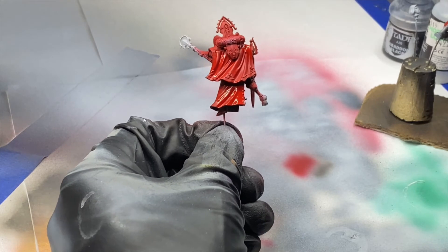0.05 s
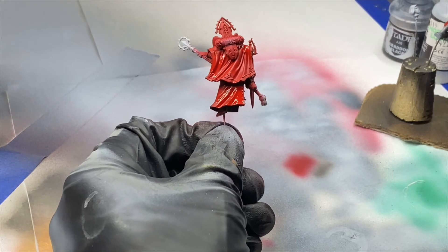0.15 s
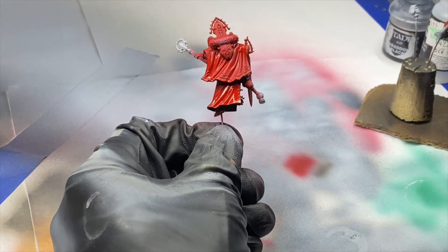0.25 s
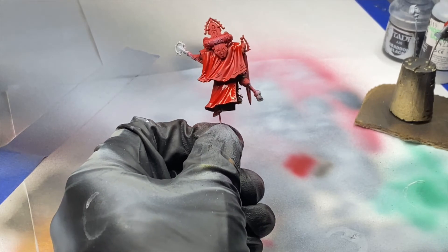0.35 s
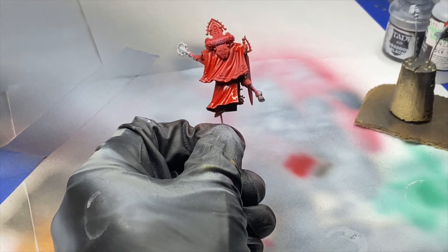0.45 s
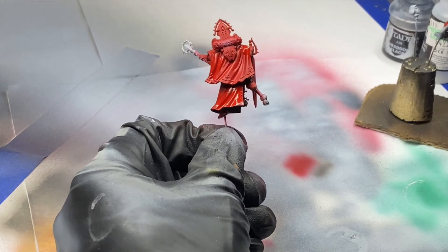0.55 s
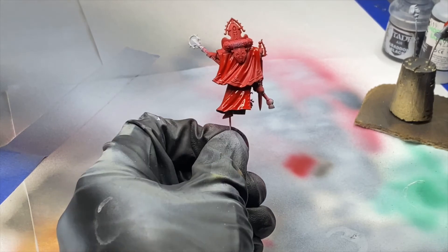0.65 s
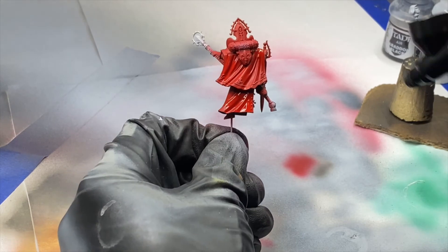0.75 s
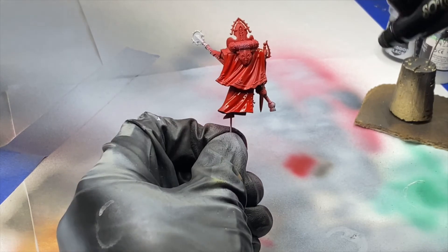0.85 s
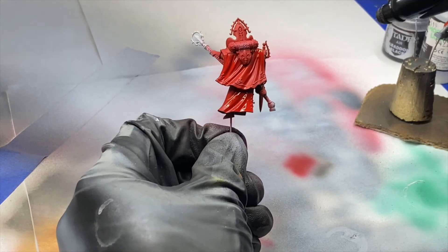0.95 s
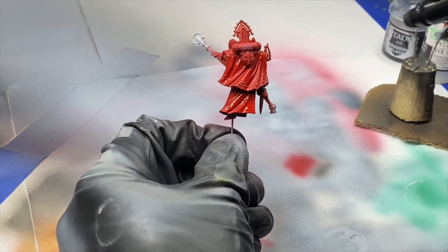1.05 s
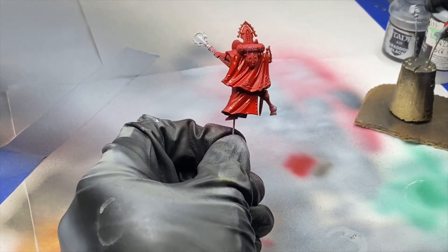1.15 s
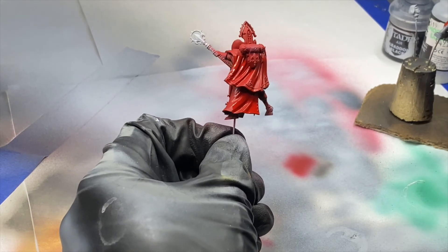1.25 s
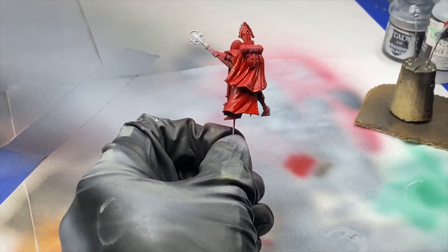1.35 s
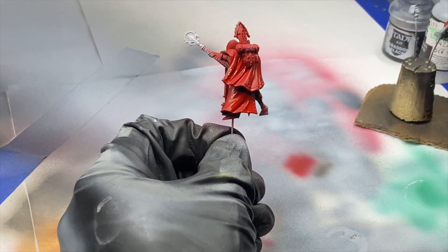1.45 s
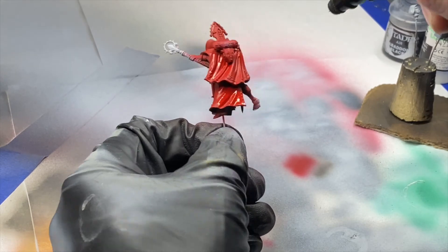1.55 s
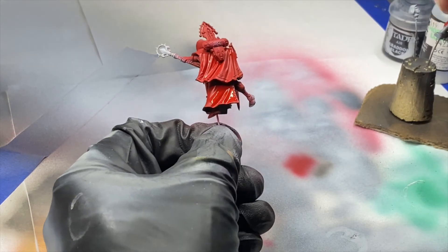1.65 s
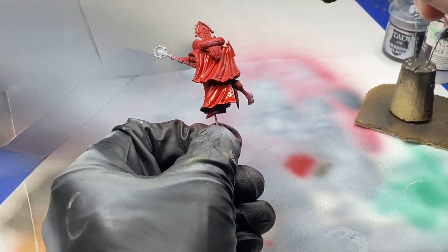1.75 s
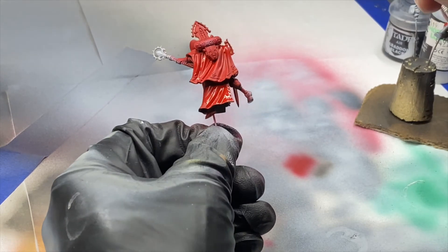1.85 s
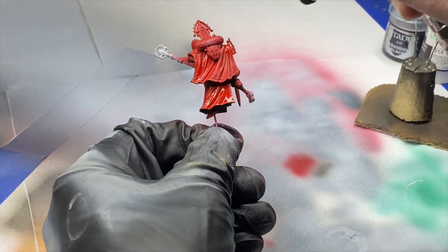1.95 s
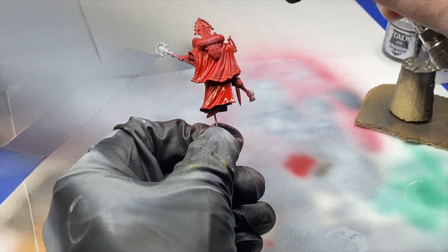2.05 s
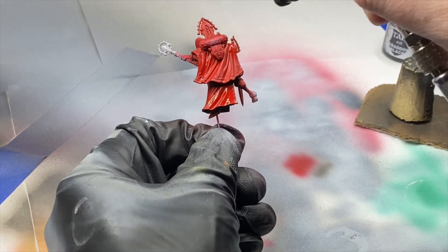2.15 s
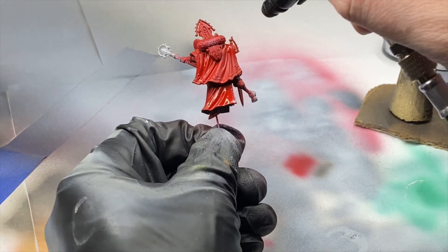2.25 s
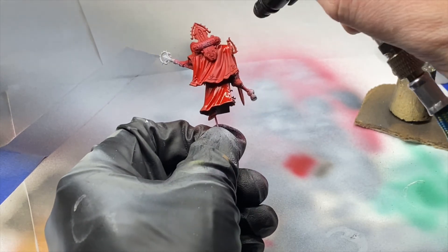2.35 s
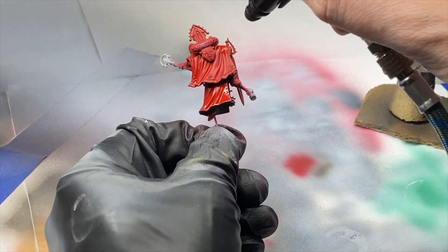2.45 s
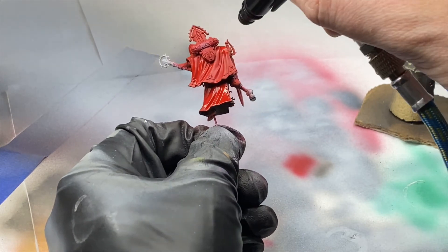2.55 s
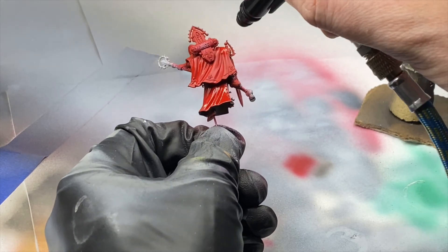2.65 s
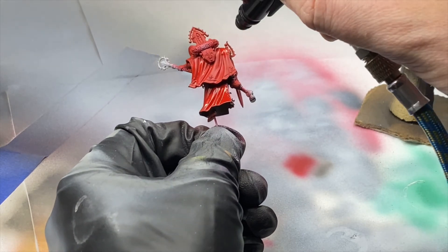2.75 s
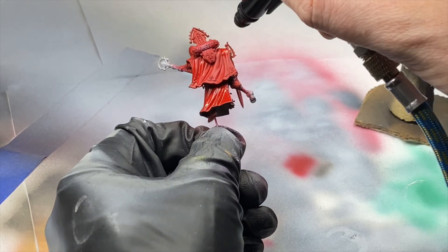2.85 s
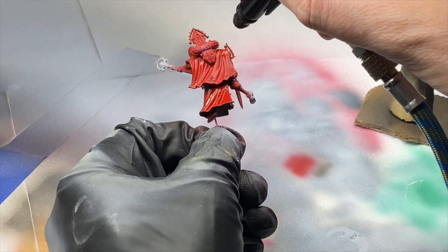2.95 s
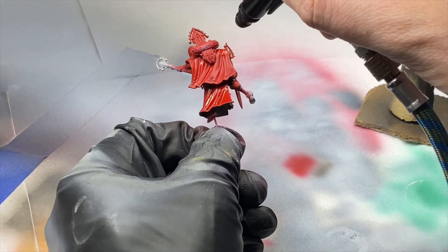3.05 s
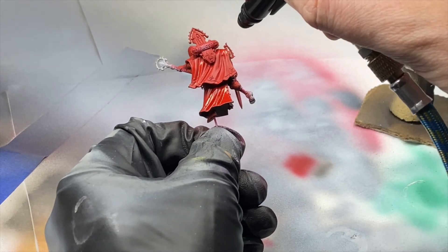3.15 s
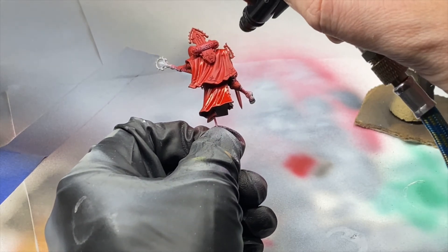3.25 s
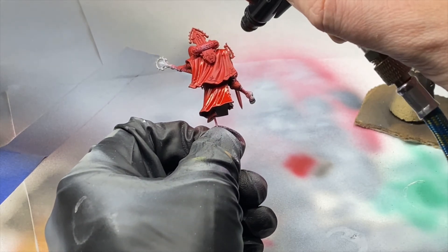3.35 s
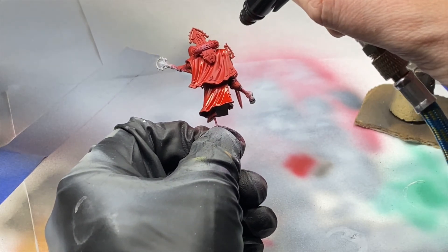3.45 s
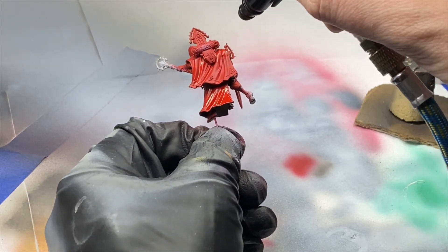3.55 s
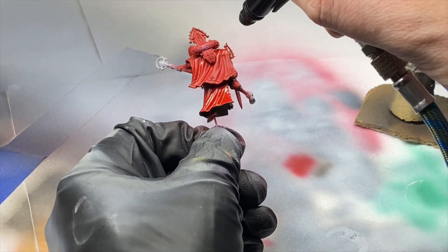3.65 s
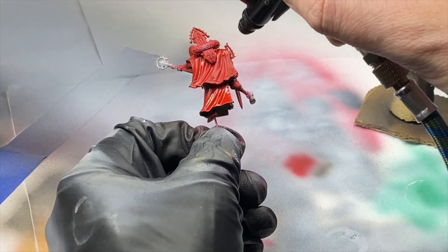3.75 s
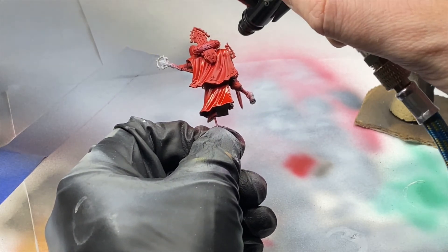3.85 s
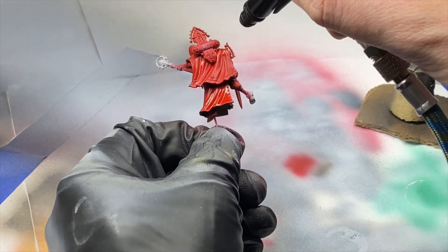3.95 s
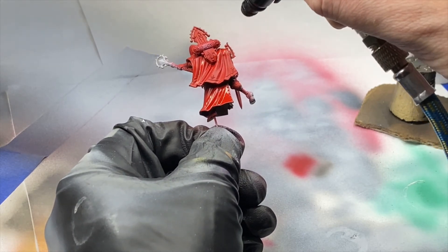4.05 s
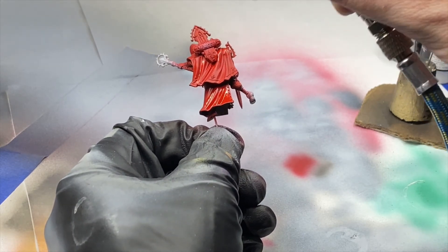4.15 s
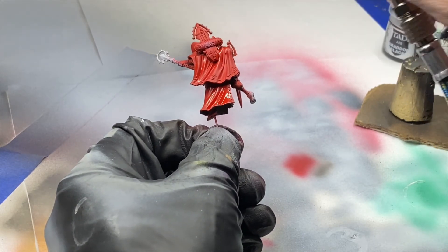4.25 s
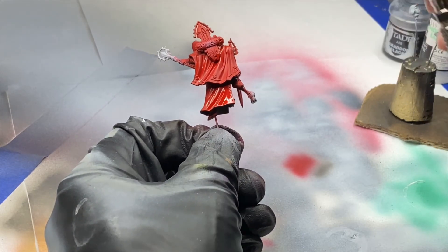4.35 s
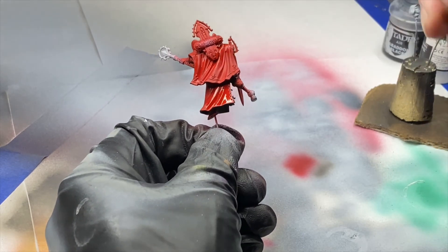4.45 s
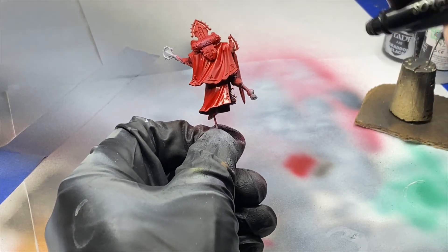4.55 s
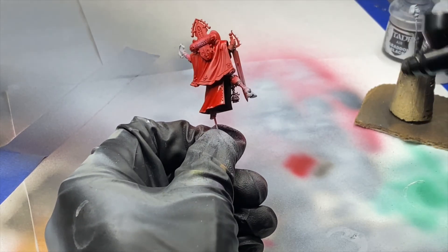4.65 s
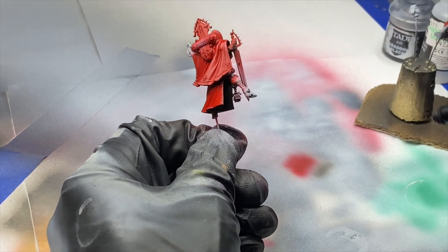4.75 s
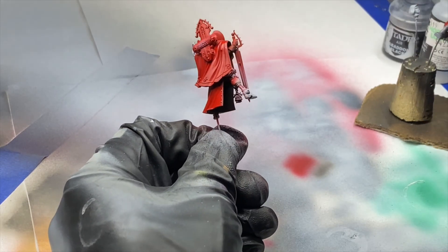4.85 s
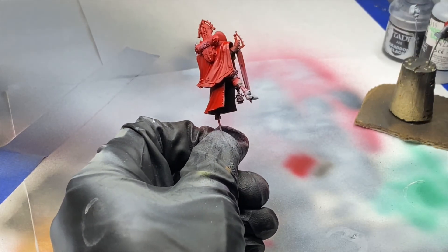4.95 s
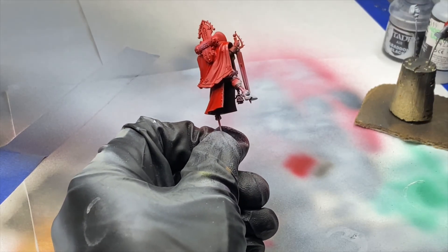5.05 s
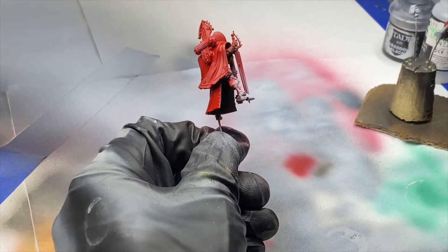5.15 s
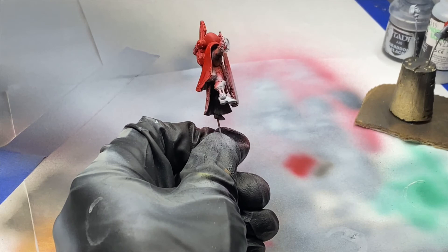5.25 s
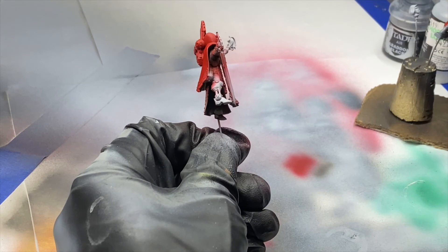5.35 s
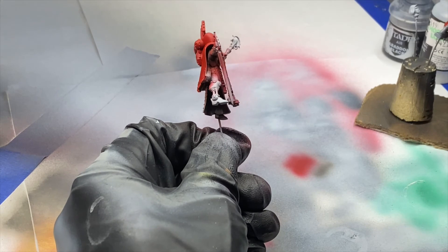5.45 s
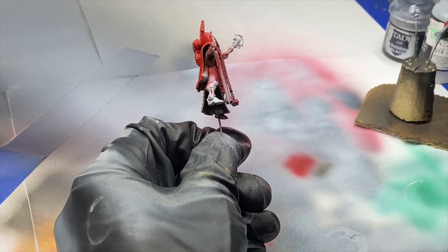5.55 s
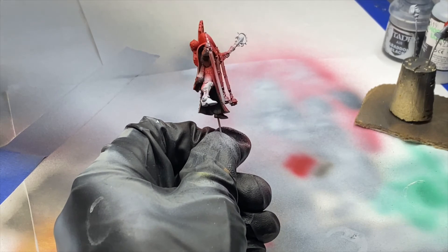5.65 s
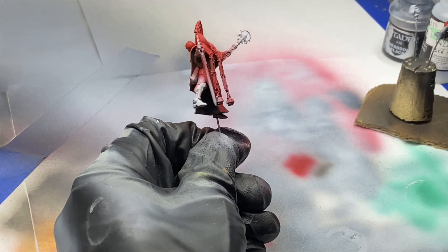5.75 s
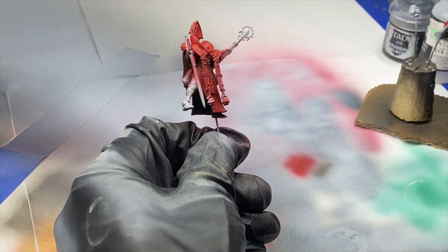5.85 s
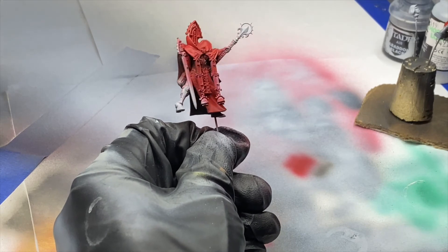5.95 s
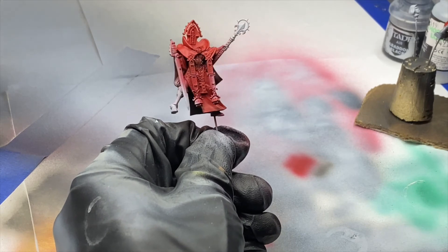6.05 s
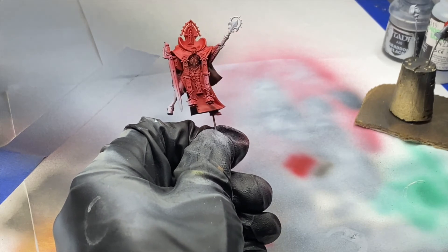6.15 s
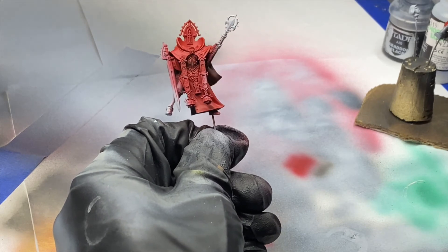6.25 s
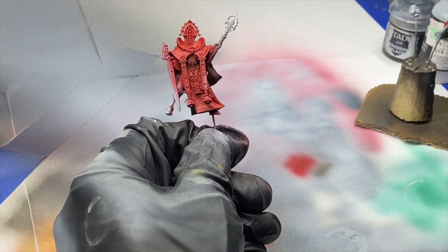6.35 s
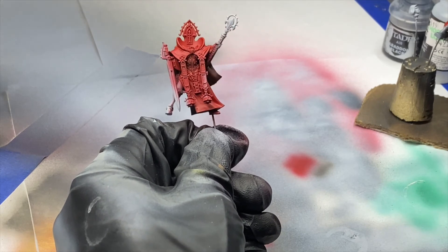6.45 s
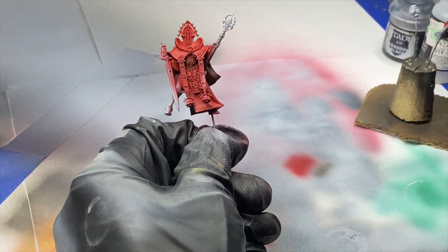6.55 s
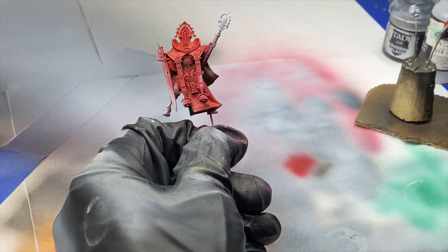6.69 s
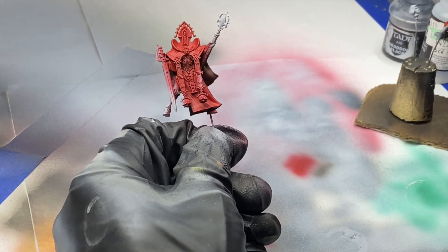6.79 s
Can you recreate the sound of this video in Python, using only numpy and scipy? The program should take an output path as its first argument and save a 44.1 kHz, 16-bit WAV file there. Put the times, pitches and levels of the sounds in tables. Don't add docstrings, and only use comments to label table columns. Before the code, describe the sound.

A small spray gun hisses twice, about a second each, bright and airy, then only muffled fan hum and faint soft hand bumps remain.

```python
import sys
import numpy as np
from scipy import signal
from scipy.fft import rfft, irfft, next_fast_len
from scipy.io import wavfile
from scipy.ndimage import uniform_filter1d, map_coordinates

SR = 44100
rng = np.random.default_rng(int(sys.argv[2]) if len(sys.argv) > 2 else 0)


def natural_amplitude(level_db):
    exponent = np.asarray(level_db, float) / 20
    return 10 ** exponent


def put_to_file(sound):
    columns = np.atleast_2d(sound).T
    safe = np.clip(columns, -1, 1)
    whole_steps = np.round(safe * 32767)
    wavfile.write(sys.argv[1], SR, whole_steps.astype(np.int16))


N = 300762
BLOWING = [slice(SR, 5 * SR // 2), slice(5 * SR // 2, 9 * SR // 2)]


def airbrush():
    return sum(valve(*VALVE[k]) * (nozzle(k) + splash(k)) for k in range(len(VALVE)))


# start_s, rise [s], shut_s, fall_t60 [s]
VALVE = [
    (1.105, .006, 2.019, 0.098),
    (2.856, .014, 4.078, 0.062),
]


def valve(opens, rise, shuts, t60):
    t = np.arange(N) / SR
    swell = 1 / (1 + np.exp(np.clip((opens - t) / (rise / 3), -60, 60)))
    return swell * natural_amplitude(-60 * np.clip(t - shuts, 0, None) / t60)


# start_s, pressure [dB], needle opening [0-1]
TRIGGER_PULL = [
    [(1.1, -63, .1), (1.112, -53.5, 0), (1.144, -51.5, 0), (1.155, -48, 0.83), (1.2, -53, 0.66),
     (1.36, -51, 0.4), (1.45, -51, .8), (1.64, -52.5, 0.73), (2.0, -53.5, 0.76)],
    [(2.855, -55, 0.6), (2.872, -41.5, 1.1), (3.1, -47, 0.91), (3.22, -46.5, 0.42), (3.37, -46.5, 0.46),
     (3.5, -46.5, 0.9), (3.68, -46.5, 0.4), (3.9, -47.5, 0.15), (4.0, -47.5, 0.7)],
]
# frequency [Hz], density [dB per Hz]
JET = [
    [(5000, -60.5), (7000, -27.5), (8600, -17), (9700, -5), (10900, -3), (12500, -1), (13800, -4.5),
     (15700, -8)],
    [(5000, -71.5), (7500, -27.5), (8700, -8.5), (9500, -2), (11000, -2.5), (13200, -1.5), (14500, -6),
     (15700, -7.5)],
]
# pitch [Hz], width [Hz], level [dB]
CAP = [
    [(10150, 460, -5), (11030, 410, 1.5)],
    [(11100, 390, -1.5), (11380, 290, -0.5)],
]
# start_s, end_s, start level [dB re jet], end level [dB re jet]
CAP_SINGS = [
    (1.147, 1.31, 7.5, 5.5),
    (1.42, 2.03, 2, 6),
    (3.24, 3.47, 3, 4),
    (3.49, 3.69, 7, -3.5),
    (3.86, 4.01, 7, 7),
]
CAP_IDLE_DB = [-1, -4.5]
# frequency [Hz], density [dB per Hz]
ROAR = [
    [(5500, -52.5), (6300, -7.5), (7000, -11.5), (7600, -4), (8200, -2), (9000, -2), (10500, -51)],
    [(5000, -50.5), (5900, -3.5), (6300, -6.5), (6700, 1), (7800, 1.5), (8400, -3), (9400, -8),
     (11000, -39)],
]
# pitch [Hz], width [Hz], level [dB]
WHISTLE = [
    [(7350, 400, 0)],
    [(7150, 200, 0)],
]
# level when shut [dB re jet], gain when open [dB]
ROAR_LAW = [
    (-24.5, 18.3),
    (-19.5, 14.3),
]
WHISTLE_LAW = [
    (-34, 24),
    (-26, 22),
]
NEEDLE_LEADS_S, NEEDLE_BACK = .05, 0.37


def nozzle(k):
    span = BLOWING[k]
    jet_db, needle = curves(TRIGGER_PULL[k])
    spring_back = np.clip((np.arange(N) / SR - VALVE[k][2]) / NEEDLE_LEADS_S + 1, 0, 1)
    needle = needle - NEEDLE_BACK * spring_back
    roar_shut, roar_gain = ROAR_LAW[k]
    whistle_shut, whistle_gain = WHISTLE_LAW[k]
    roar_db = roar_shut + roar_gain * needle + 4.0
    whistle_db = whistle_shut + whistle_gain * needle - 1.5 + 2.8 * wobble(14)
    eddies = natural_amplitude(1.1 * wobble(700) + 0.24 * wobble(40))

    jet = natural_amplitude(5) * rush(shape(JET[k]), span=span, patchy_db=1.0, speckle=.15)
    cap_gain = natural_amplitude(-1.9) * passes(CAP_SINGS, CAP_IDLE_DB[k], edge_s=.022)
    cap = cap_gain * rush(modes(CAP[k]), span=span, patchy_db=0.1, speckle=0.1517)
    roar = natural_amplitude(roar_db) * rush(shape(ROAR[k]), span=span, patchy_db=2.5, speckle=0.46)
    whistle = natural_amplitude(whistle_db) * rush(modes(WHISTLE[k]), span=span, patchy_db=3.9, speckle=.15)
    return natural_amplitude(jet_db + 0.52) * eddies * (jet + cap + roar + whistle)


# pitch [Hz], width [Hz], level [dB]
HOLLOWS = [
    [[(5180, 230, 2), (5820, 780, -4.5)], [(4780, 470, 0), (4450, 300, -13.5)], [(2930, 350, 3),
     (3570, 1800, 1.5)], [(1300, 370, -0.5), (1814, 180, -3)]],
    [[(5550, 300, -3), (5060, 500, -13)], [(4700, 550, 1.5), (5250, 700, -1.5)], [(3360, 508, -2.5),
     (4082, 600, -1)], [(2270, 250, -2.5), (2696, 280, 2.5), (3167, 300, -2.5)]],
]
# start_s, end_s, start level [dB], end level [dB]
UPPER_FOLD = [(1.144, 1.34, -54, -69.5), (1.383, 1.915, -54.5, -56), (1.952, 1.981, -52, -61.5),
              (2.854, 3.02, -67.5, -61), (3.016, 3.28, -56, -72), (3.29, 3.645, -61, -63),
              (3.65, 3.88, -55, -58), (3.925, 4.03, -59.5, -65)]
LOWER_FOLD = [(1.13, 1.34, -63.5, -75), (1.396, 1.938, -61, -61), (1.94, 2.002, -61, -67),
              (2.85, 3.275, -52.5, -62.5), (3.295, 3.62, -59.5, -52.5), (3.65, 3.7, -53.5, -58),
              (3.877, 4.073, -55, -59.5)]
SCATTER = [(1.4, 2.007, -86, -77), (2.877, 3.192, -56.5, -55.5), (3.2, 3.301, -58, -61.5),
           (3.399, 3.653, -61, -59.5), (3.723, 3.793, -65, -66), (3.931, 4.086, -69, -62)]
BASE = [(1.462, 1.533, -66.5, -65), (1.558, 1.635, -65.5, -69), (1.66, 1.8, -70, -70),
        (1.851, 1.985, -64.5, -71.5), (2.889, 3.2, -67, -61.5), (3.21, 3.636, -60.5, -62.5),
        (3.637, 3.905, -58.5, -65), (3.897, 4.072, -62.5, -72)]
STRAY_DB = [
    [-71.5, -82, -91, -83.5],
    [-68, -72.5, -71, -73.5],
]
PAINT_STARTS = [1.143, 2.856]
PAINT_ON_S, TREMOR_DB = 0.011, 1.5


def splash(k):
    paint = np.clip((np.arange(N) / SR - PAINT_STARTS[k]) / PAINT_ON_S, .25, 1)
    sweeps = [UPPER_FOLD, LOWER_FOLD, SCATTER, BASE]
    out = np.zeros(N)
    for rows, stray_db, hollow in zip(sweeps, STRAY_DB[k], HOLLOWS[k]):
        ring = rush(modes(hollow), span=BLOWING[k], patchy_db=2.43, speckle=0.41)
        out += natural_amplitude(TREMOR_DB * wobble(12)) * passes(rows, stray_db) * ring
    return paint * out


# start_s, end_s, start level [dB], end level [dB]
OVERSPRAY = [
    (3.12, 3.24, -75, -75.5),
    (3.76, 3.9, -70.5, -75),
]
# pitch [Hz], width [Hz], level [dB]
BENCH = [
    (1470, 500, 0.5),
    (1900, 400, -2.5),
]


def overspray():
    return passes(OVERSPRAY, -120) * rush(modes(BENCH), span=BLOWING[1], patchy_db=1.5, speckle=.25)


# delay [s], gain [ratio]
BOOTH = [(.0011, 0.12), (.0019, -0.151), (.0032, 0.12), (.0047, 0.095), (.0071, -.12), (0.01, 0.082)]


def booth(x):
    return x + sum(gain * np.roll(x, round(s * SR)) for s, gain in BOOTH)


# start_s, level_db (peak), pitch factor [ratio]
TICKS = [
    (1.096, -51.5, 1.01),
    (2.846, -69, 1.3),
]
# pitch_hz, level_db, t60_s
TRIGGER = [(5330, -5.5, .008), (9900, -1, .007), (10870, 3.5, .008)]


def trigger():
    out, t = np.zeros(N), np.arange(SR // 20) / SR
    onset = (1 - np.exp(-t / .002)) ** 2
    for s, db, pitch in TICKS:
        ring = sum(natural_amplitude(level - 60 * t / t60) * np.sin(2 * np.pi * pitch * hz * t) for hz, level, t60 in TRIGGER)
        out[round(s * SR):][:len(t)] += natural_amplitude(db + 13.5) * ring * onset
    return out


# start_s, length_s, start_hz, end_hz, level_db
SQUEAKS = [
    (2.31, .04, 13900, 14100, -98),
    (2.44, .07, 14850, 14800, -96),
    (4.77, 0.048, 14100, 13900, -91),
    (4.87, .1, 14800, 14850, -98),
    (5.057, .13, 14550, 12700, -94),
]


def glove():
    out = np.zeros(N)
    for s, length, start_hz, end_hz, db in SQUEAKS:
        n = int(length * SR)
        pitch = np.linspace(start_hz, end_hz, n) + 60 * wobble(200)[:n]
        out[round(s * SR):][:n] += natural_amplitude(db) * np.hanning(n) * np.sin(2 * np.pi * np.cumsum(pitch) / SR)
    return out


# start_s, level_db, pitch_hz, t60_s
BUMPS = [(.93, -62, 520, .08), (1.16, -64, 190, .1), (2.98, -60, 240, .12), (3.28, -60, 180, .1),
         (4.19, -62, 200, .1), (4.46, -60, 220, .1), (4.58, -62, 520, .08), (4.85, -63, 230, .1),
         (5.345, -61, 230, .1), (5.665, -61, 220, .1), (6.11, -62, 220, .1)]


def hand():
    out, t = np.zeros(N), np.arange(SR // 5) / SR
    for s, db, hz, t60 in BUMPS:
        push = np.sin(2 * np.pi * hz * t) + 0.1 * np.sin(2 * np.pi * 0.7 * hz * t)
        out[round(s * SR):][:len(t)] += natural_amplitude(db - 60 * t / t60) * (1 - np.exp(-t / 0.0017)) * push
    return out


# multiple of the blade rate, level [dB re drone]
ORDERS_DB = [(7, -8), (8, -5), (12, -19), (14, -20.5)]
# frequency [Hz], density [dB per Hz]
DRONE = [(15, -70), (25, -30), (92, -31), (228, -4), (305, -7), (415, -7), (468, -4.5), (510, -3),
         (546, -3.5), (615, -7.5), (718, -10), (838, -7), (994, -14.5), (1260, -29), (1500, -28),
         (1950, -56), (3300, -120)]
# frequency [Hz], density [dB per Hz]
AIRFLOW = [(650, -28.5), (1100, -1), (1250, -7.0), (1520, -11.5), (1710, -6.5), (1940, -12.5),
           (2160, -11.5), (2530, -13.5), (2920, -8), (3340, -7.5), (3640, -9.5), (4120, -10), (5200, -18),
           (6760, -45.0), (11400, -120), (9000, -31), (14000, -44.5)]
BLADE_HZ, AIR_TOP_HZ = 69.03, 13900
FAN_DB, AIRFLOW_DB = -68.5, -81.5
FAN_LIFT_DB, AIRFLOW_LIFT_DB = 8, 8


def fan():
    free = suppressor()
    drone_db = FAN_DB + FAN_LIFT_DB * free + 0.91 * wobble(14)
    air_db = AIRFLOW_DB + AIRFLOW_LIFT_DB * free + .6 * wobble(5)
    turn = 2 * np.pi * np.cumsum(BLADE_HZ * (1 + .001 * wobble(3))) / SR
    blades = np.zeros(N)
    for k, db in ORDERS_DB:
        level = np.sqrt(2) * natural_amplitude(db + 1.75 * wobble(14))
        blades += level * np.sin(k * turn + 2 * np.pi * rng.random() + .4 * wobble(14))
    duct = rush(below_top(DRONE), patchy_db=1.5, hz_bins=2, speckle=0.024)
    duct *= natural_amplitude(-2.0 + 0.46 * wobble(12))
    air = rush(below_top(AIRFLOW), patchy_db=1.83, hz_bins=3, frames=14, speckle=.4)
    return natural_amplitude(drone_db) * (blades + duct) + natural_amplitude(air_db) * air


# frequency [Hz], density [dB per Hz]
HISS = [(4000, -62), (5200, -1.5), (7000, -2), (10000, -4.5), (13000, -8.5), (14000, -17.5)]
HISS_DB, HISS_LIFT_DB = -89, 5


def microphone():
    hiss_db = HISS_DB + HISS_LIFT_DB * suppressor() + .8 * wobble(3.4)
    return natural_amplitude(hiss_db) * rush(below_top(HISS), patchy_db=2.5, speckle=.4)


# opening time constant [s], hold after the jet [s], closing time [s]
SUPPRESSOR = [
    (0.14, .1, 1.1),
    (.06, 0.046, 0.66),
]


def suppressor():
    t = np.arange(N) / SR
    freed = []
    for (opens, _, shuts, _), (lets_go, lingers, grips) in zip(VALVE, SUPPRESSOR):
        opening = 1 - np.exp(-np.clip(t - opens, 0, None) / lets_go)
        freed.append(opening * np.clip(1 - (t - shuts - lingers) / grips, 0, 1))
    return np.max(freed, axis=0)


def passes(rows, idle_db, edge_s=.055):
    t = np.arange(0, N / SR, 1 / 1000)
    edge = lambda s: np.clip(s / edge_s + .5, 0, 1)
    power = natural_amplitude(idle_db) ** 2
    for start, end, db, end_db in rows:
        gain = natural_amplitude(np.interp(t, [start, end], [db, end_db])) * edge(t - start) * edge(end - t)
        power = power + gain ** 2
    return np.interp(np.arange(N) / SR, t, np.sqrt(power))


def rush(response, patchy_db, hz_bins=8, frames=8, speckle=.25, span=slice(0, N)):
    out, n = np.zeros(N), span.stop - span.start
    z = signal.stft(rng.standard_normal(n), nperseg=1024)[2]
    field = uniform_filter1d(rng.standard_normal(z.shape), int(2 * hz_bins), 0)
    field = uniform_filter1d(field, int(frames / 2) + 1, 1)
    z = z * natural_amplitude(patchy_db * unit(field)) * np.abs(z) ** np.clip(speckle, 0, 1)
    x = signal.istft(z, nperseg=1024)[1][:n]
    m = next_fast_len(n + 8192)
    coloured = rfft(x, m) * response(np.fft.rfftfreq(m, 1 / SR))
    out[span] = unit(irfft(coloured, m)[:n])
    return out


def shape(points):
    f, db = np.transpose(points)
    return lambda hz: natural_amplitude(np.interp(np.log(hz + 1), np.log(f + 1), db))


def below_top(points):
    return lambda hz: shape(points)(hz) * (hz < AIR_TOP_HZ)


def modes(rows):
    return lambda f: sum(natural_amplitude(db) * (f * w / np.abs(c * c - f * f + 1j * f * w + 1)) ** 2 for c, w, db in rows)


def curves(rows):
    s, *cols = np.transpose(rows)
    return [np.interp(np.arange(N) / SR, s, c) for c in cols]


def wobble(rate):
    return map_coordinates(rng.standard_normal(int(N * rate / SR) + 4), [np.arange(N) * rate / SR])


def unit(x):
    return x / np.sqrt(np.mean(x ** 2) + 1e-20)


def scene():
    mono = booth(airbrush() + overspray()) + trigger() + glove() + hand() + fan()
    return np.array([mono, mono])


def low_pass(x):
    return signal.sosfilt(signal.butter(12, 15840, fs=SR, output="sos"), x)


def record(dry):
    limit = signal.ellip(8, .5, 70, 15800, fs=SR, output="sos")
    mix = signal.sosfilt(limit, dry + microphone())
    return low_pass(mix)


dry = scene()
out = record(dry)
put_to_file(out)
```